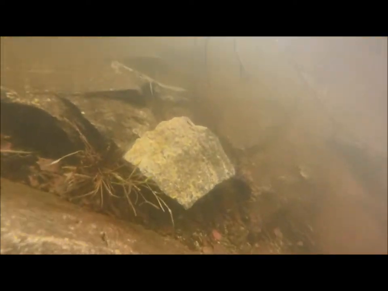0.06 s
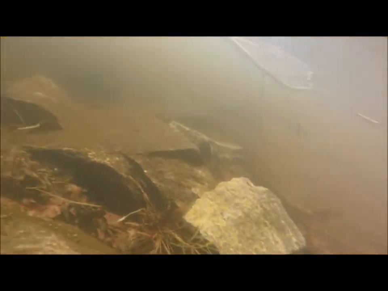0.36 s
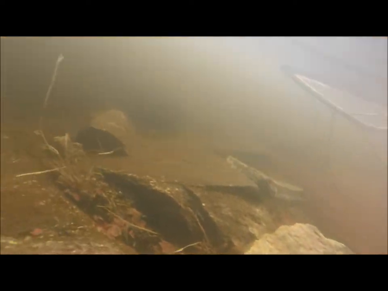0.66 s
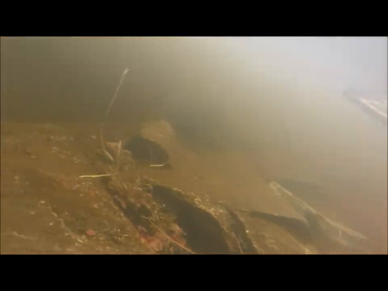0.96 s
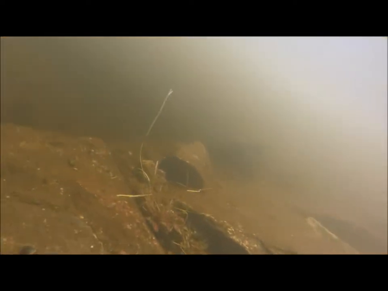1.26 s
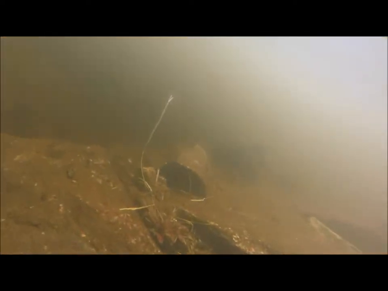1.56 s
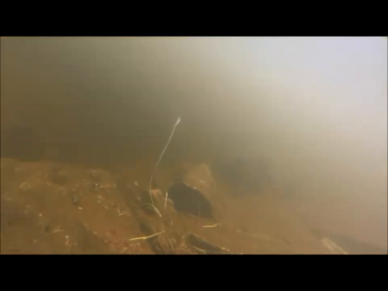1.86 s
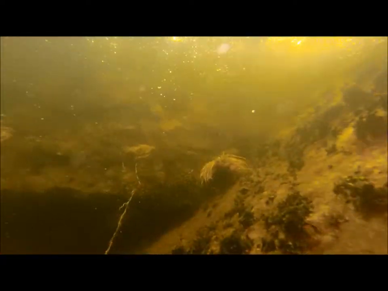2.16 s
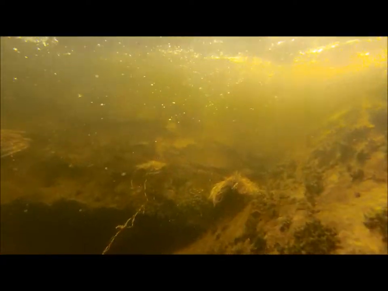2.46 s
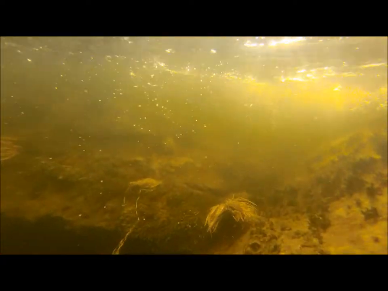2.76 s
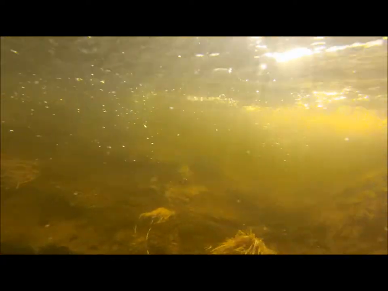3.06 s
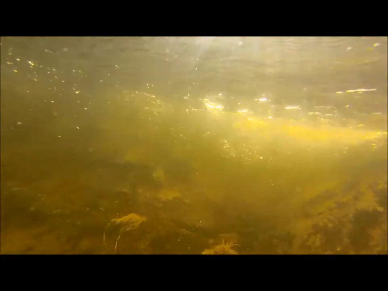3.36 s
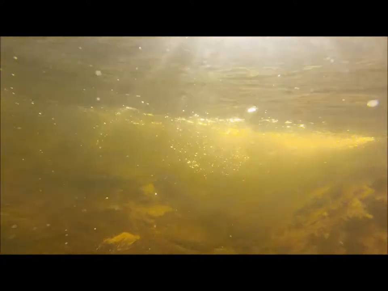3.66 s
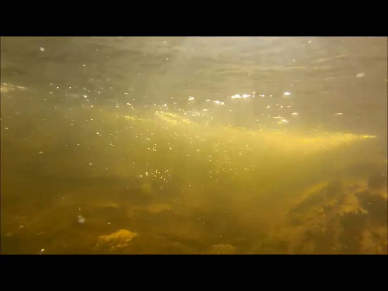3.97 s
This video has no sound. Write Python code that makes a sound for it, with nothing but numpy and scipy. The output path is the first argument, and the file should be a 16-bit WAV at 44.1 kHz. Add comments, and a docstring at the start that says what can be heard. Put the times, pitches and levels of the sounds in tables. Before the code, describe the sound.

A stream gurgling underwater, with low rumble, deep thumps, knocks and small pinging bubbles.

```python
"""A running stream gurgles, heard underwater from a camera microphone inside a waterproof case.
The case first drifts in still water, with a low rumble and a faint hiss; after a brief dropout it is
in the current. There it sways with deep thumps, water and grit brush it in swishes, and clicks and
knocks set it ringing. Small bubbles ping close by."""
import sys
import numpy as np
from scipy import signal
from scipy.fft import rfft, irfft
from scipy.io import wavfile
from scipy.ndimage import uniform_filter1d

SR = 44100
rng = np.random.default_rng(int(sys.argv[2]) if len(sys.argv) > 2 else 0)


def persist_wave(psi):
    """Save psi, clipped to +-1, as 16-bit WAV."""
    counts = np.round(np.clip(psi, -1, 1) * 32767).astype(np.int16)
    wavfile.write(sys.argv[1], SR, np.atleast_2d(counts).T)


N = 176400
TIME = np.arange(N) / SR
DROPOUT_FROM_S, DROPOUT_TO_S, DROPOUT_DB = 1.886, 1.917, -22
BUBBLE_RISE_S = 0.00044

# Tone of each noise at the microphone. Each row: frequency in Hz, relative density in dB.
HISS_SPECTRUM = [(60, 1.5), (400, -11.5), (12000, -27), (15500, -31.5)]
RUMBLE_SPECTRUM = [(12, 8.5), (22, -3.5), (38, -1.5), (60, -9), (100, -23), (170, -33), (400, -36)]
BUMP_SPECTRUM = [(50, 12.5), (85, 3.5), (160, 1), (280, -6), (500, -18.5), (1200, -39)]
TICK_SPECTRUM = [(600, 3), (1800, 8), (4200, 1.5), (6500, -11), (13000, -17)]
GURGLE_SPECTRUM = [(120, -14.5), (400, -11), (490, -9), (570, 0), (660, -2), (730, 0), (850, -14.5),
                   (1000, -11.5), (1130, -22.5), (1350, -34.5), (1700, -24), (3500, -40.5)]
SWISH_SPECTRUM = [(250, -3.5), (480, -10.5), (700, 4), (1100, -5), (1330, 1.5), (1780, -5), (2050, -4),
                  (3100, -14), (3450, -14), (4100, -24.5), (7000, -29)]
SPRAY_SPECTRUM = [(2000, -20), (3450, 18), (4200, -1), (5900, 0), (8000, -29), (11500, -11), (15000, -36)]
# Strength of the rumble and of the current. Each row: time in seconds, level in dB.
RUMBLE_LEVEL = [(0, -50.5), (.4, -61.5), (1.85, -50), (2.0, -36), (2.2, -46), (2.35, -44), (2.72, -54.5),
                (2.92, -37), (3.12, -28), (3.27, -44), (3.42, -33.5), (3.55, -42), (4, -48.5)]
CURRENT_LEVEL = [(1.92, -58), (2.03, -45), (2.1, -53), (2.19, -51.5), (2.24, -49.5), (2.4, -51),
                 (2.56, -51), (2.71, -59), (2.86, -51.5), (2.99, -52.5), (3.33, -54), (3.52, -61),
                 (3.64, -54.5), (3.73, -61.5), (4, -56.5)]
# Bumps and brushes on the case. Each row: peak time in seconds, level in dB, rise and fall in seconds.
BUMPS = [(.617, -56.5, 0.0076, .012), (1.46, -53, 0.042, 0.028), (2.03, -45.5, 0.014, 0.0082),
         (3.01, -37.5, 0.0086, 0.0035), (3.08, -53, 0.028, 0.016), (3.128, -32, 0.0076, 0.0085),
         (3.4, -52, 0.11, 0.058), (3.96, -55.5, 0.047, 0.031)]
SWISHES = [(1.98, -53.5, 0.016, 0.018), (2.025, -50, 0.009, 0.0062), (2.95, -60.5, 0.018, 0.022),
           (3.068, -50.5, 0.014, 0.018), (3.13, -39.5, 0.0037, 0.0046), (3.15, -55, 0.037, 0.034),
           (3.25, -49, 0.036, 0.057), (3.397, -40.5, 0.023, 0.029)]
# Contacts with the case. Each row: start in seconds, level in dB.
TICKS = [(0.701, -54.5), (1.939, -42.5), (2.35, -50), (2.938, -50), (3.033, -51.5)]
CLICKS = [(2.2427, -27)]
KNOCKS = [(2.3455, -14), (2.9362, -28)]
# Three sizes of tiny bubble. Each row: pitch in Hz, level in dB at average current, t60 in seconds,
# bubbles per second.
FIZZ_SIZES = [(1286, -65, 0.07, 24), (3524, -65, 0.014, 60), (5200, -63, 0.011, 36)]
# Sways of the case. Each row: start in seconds, level in dB, pitch in Hz, rise in seconds.
THUMPS = [(1.971, -24, 28.6, 0.023), (2.035, -20.5, 28.5, 0.012), (2.143, -27.5, 30, 0.015),
          (2.915, -31, 38.2, 0.037), (3.004, -15.5, 31.6, 0.025), (3.123, -23, 89, 0.0049),
          (3.128, -17, 38.4, 0.016)]
# Close bubbles. Each row: start in seconds, level in dB, pitch in Hz, t60 in seconds.
BUBBLES = [(2.0333, -27.5, 2620, 0.0086), (2.4448, -50, 5370, 0.012), (2.659, -51, 2900, 0.014),
           (2.844, -53, 5280, .012), (2.998, -44, 4900, 0.012), (3.0633, -50, 5300, 0.012),
           (3.076, -20, 2160, 0.0034), (3.152, -43, 5000, 0.0057), (3.687, -45, 2900, 0.026),
           (3.818, -57, 5000, 0.024), (3.919, -50, 1970, 0.095), (3.962, -46, 1625, 0.064),
           (3.991, -46, 1630, 0.033)]
# Gulps in the current. Each row: start in seconds, level in dB, pitch in Hz.
GULPS = [(2.135, -40.5, 637), (2.208, -35.5, 652), (2.229, -34.5, 634), (2.261, -36.5, 676),
         (2.39, -41, 710), (2.519, -35, 600), (2.578, -41, 617), (2.897, -33, 678), (3.011, -43, 860),
         (3.066, -40, 820), (3.298, -39, 665), (3.652, -46.5, 752), (3.79, -43.5, 638), (3.826, -51.5, 910)]
# Modes of the struck case. Each row: frequency in Hz, relative level in dB, t60 in seconds.
CLICK_MODES = [(308.7, -23, 0.4), (703, -5.5, 0.037), (920, -1.5, 0.011), (2430, 0, 0.0045),
               (2670, -9, 0.019), (3440, -0.5, 0.003), (5120, -1, 0.014), (5670, 1, 0.0055),
               (7030, -20, 0.0078)]
KNOCK_MODES = [(338, -9.5, 0.018), (459, -11.5, 0.048), (657, 5, 0.0095), (752, -16, 0.023),
               (1107, -14.5, 0.042), (1460, -12, 0.013), (2125, -20, 0.015)]


def from_db(db):
    """Decibels to gain."""
    return 10 ** (np.asarray(db) / 20)


def unit_rms(x):
    """Scale to an rms of 1."""
    return x / np.sqrt(np.mean(x ** 2) + 1e-20)


def in_time(rows):
    """Join (seconds, value) rows by straight lines."""
    return np.interp(TIME, *np.transpose(rows))


def coloured(x, spectrum):
    """Filter x by a spectrum that falls away steeply past its ends; rms 1."""
    hz, db = np.transpose(spectrum)
    f = np.maximum(np.arange(N // 2 + 1) * SR / N, 1)
    skirts = np.minimum(f / hz[0], 1) ** 2 * np.minimum(hz[-1] / f, 1) ** 2
    gain = from_db(np.interp(np.log(f), np.log(hz), db))
    return unit_rms(irfft(rfft(x) * skirts * gain, N))


def drift(hz):
    """Random wander, mostly slower than hz; rms 1."""
    pole = np.exp(-2 * np.pi * hz / SR)
    wander = signal.lfilter([1], [1, -2 * pole, pole * pole], rng.standard_normal(N + SR))
    return unit_rms(wander[SR:])


def grains(per_s, spread_db):
    """Random impulses of uneven size and sign."""
    sizes = from_db(spread_db * np.minimum(rng.exponential(1, N), 4))
    return (rng.random(N) < per_s / SR) * sizes * rng.choice([-1, 1], N)


def swells(rows, shape=1.56):
    """Envelope of swells that add in power; shape 2 is a round bell, 1 a pointed one."""
    power = 1e-18
    for peak_s, db, rise, fall in rows:
        from_peak = (TIME - peak_s) / np.where(TIME < peak_s, rise, fall)
        power += from_db(db) ** 2 * np.exp(-np.abs(from_peak) ** shape)
    return np.sqrt(power)


def ping(start, db, hz, t60, rise_s, glide_per_s):
    """One bubble rings: a dying sine whose pitch wobbles and creeps upward."""
    t = np.clip(TIME - start, 0, 2 * t60)
    wobble = 0.043 * unit_rms(uniform_filter1d(rng.standard_normal(N), size=100))
    pitch = hz * (1 + glide_per_s * t + wobble)
    phase = 2 * np.pi * np.cumsum((t > 0) * pitch) / SR
    return from_db(db - 60 * t / t60) * (1 - np.exp(-t / rise_s)) * np.sin(phase)


def hiss(db=-64):
    """A faint steady hiss lies under both places."""
    return from_db(db) * coloured(rng.standard_normal(N), HISS_SPECTRUM)


def rumble():
    """Turbulent water presses on the case."""
    return from_db(in_time(RUMBLE_LEVEL)) * coloured(rng.standard_normal(N), RUMBLE_SPECTRUM)


def bumps():
    """Dull bumps on the case come through as swells of low noise."""
    return swells(BUMPS) * coloured(rng.standard_normal(N), BUMP_SPECTRUM)


def ticks(decay_s=0.0017):
    """Bits of grit touch the case with a dry crack."""
    envelope = np.zeros(N)
    for start, db in TICKS:
        t = np.clip(TIME - start, 0, 20 * decay_s)
        envelope += from_db(db) * (TIME >= start) * np.exp(-t / decay_s)
    return envelope * coloured(rng.standard_normal(N), TICK_SPECTRUM)


def gurgle(flutter_db=1.14):
    """The current gurgles through the case wall, a dense patter of tiny pulses."""
    level_db = in_time(CURRENT_LEVEL) + flutter_db * drift(hz=25)
    return from_db(level_db) * coloured(grains(per_s=1200, spread_db=1.5), GURGLE_SPECTRUM)


def fizz(count=300, pitch_spread=0.041, spread_db=4, follows_current=0.83):
    """Tiny bubbles ping at random moments, louder where the current is strong."""
    out, t = np.zeros(N + SR), np.arange(SR // 10) / SR
    attack = 1 - np.exp(-t / BUBBLE_RISE_S)
    for hz, db, t60, per_s in FIZZ_SIZES:
        starts = np.cumsum(rng.exponential(1, count)) / per_s
        scatter = np.clip(rng.standard_normal((count, 2)), -2, 2)
        for start, (detune, strength) in zip(starts[starts < TIME[-1]], scatter):
            envelope = attack * from_db(db + spread_db * strength - 60 * t / t60)
            pitch = hz * (1 + pitch_spread * detune)
            first = int(start * SR)
            out[first:first + len(t)] += envelope * np.sin(2 * np.pi * pitch * t)
    current_db = in_time(CURRENT_LEVEL)
    return out[:N] * from_db(follows_current * (current_db - current_db.mean()))


def thumps():
    """The case sways around the microphone, a few deep swings at each push."""
    out = np.zeros(N)
    for start, db, hz, rise in THUMPS:
        t = np.maximum(TIME - start, 0)
        envelope = (t / rise * np.exp(1 - t / rise)) ** 1.3
        out += from_db(db) * envelope * np.sin(2 * np.pi * hz * t)
    return out


def swishes(spray_db=-52, spray_growth=3.4):
    """Grit and water rub along the case; the hardest strokes add a spray of treble."""
    force = swells(SWISHES)
    grit = grains(per_s=4600, spread_db=3)
    spray_gain = from_db(spray_db) * (force / force.max()) ** spray_growth
    return force * coloured(grit, SWISH_SPECTRUM) + spray_gain * coloured(grit, SPRAY_SPECTRUM)


def bubbles():
    """Single bubbles ping close to the microphone."""
    return sum(ping(*row, rise_s=BUBBLE_RISE_S, glide_per_s=0.55) for row in BUBBLES)


def gulps():
    """Larger bubbles in the current ring at a lower pitch."""
    return sum(ping(*row, t60=0.084, rise_s=0.00095, glide_per_s=1.0) for row in GULPS)


def case_hits(hits, modes, rise_s):
    """Each hit rings the case's modes, neighbours in opposite sense; a soft contact builds slowly."""
    out = np.zeros(N)
    for start, db in hits:
        t = np.clip(TIME - start, 0, .5)
        ringing = sum((-1) ** k * from_db(level - 60 * t / t60) * np.sin(2 * np.pi * hz * t)
                      for k, (hz, level, t60) in enumerate(modes))
        attack = 1 - np.exp(-(t / rise_s) ** 2)
        out += from_db(db) * attack * ringing
    return out


def scene():
    """Still water, then the stream, all heard by one microphone inside the case."""
    both_places = hiss() + rumble() + bumps() + ticks()
    current = (TIME > DROPOUT_FROM_S) * (gurgle() + fizz())
    stream = current + thumps() + swishes() + bubbles() + gulps()
    clicks = case_hits(CLICKS, CLICK_MODES, rise_s=0.000094)
    knocks = case_hits(KNOCKS, KNOCK_MODES, rise_s=0.0013)
    return (both_places + stream + clicks + knocks)[None]


def record(dry, stopband_hz=15900):
    """The sound drops out briefly between the two places; the highest treble is cut."""
    live = (TIME < DROPOUT_FROM_S) | (TIME > DROPOUT_TO_S)
    gain = uniform_filter1d(np.where(live, 1, from_db(DROPOUT_DB)), size=60)
    lowpass = signal.cheby2(20, 70, stopband_hz, fs=SR, output="sos")
    return signal.sosfilt(lowpass, dry * gain)


dry = scene()
out = record(dry)
persist_wave(out)
```